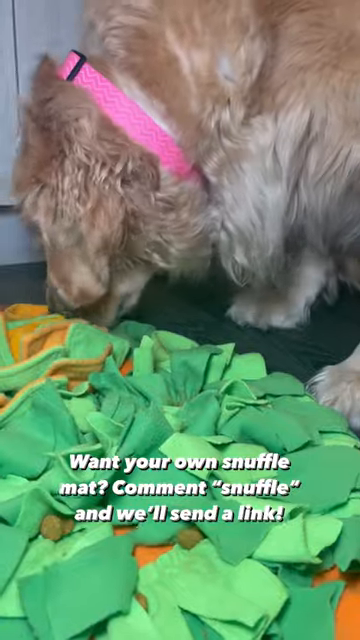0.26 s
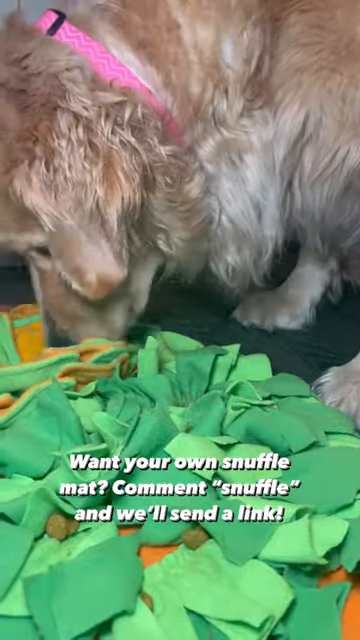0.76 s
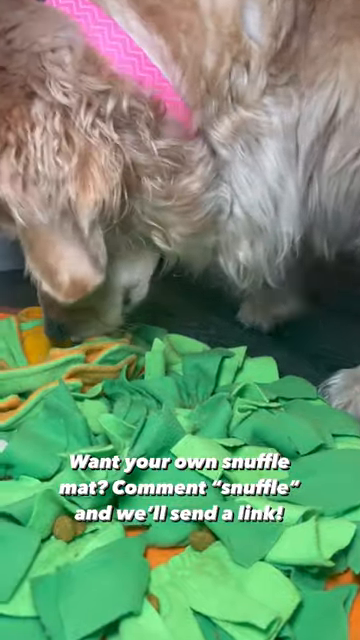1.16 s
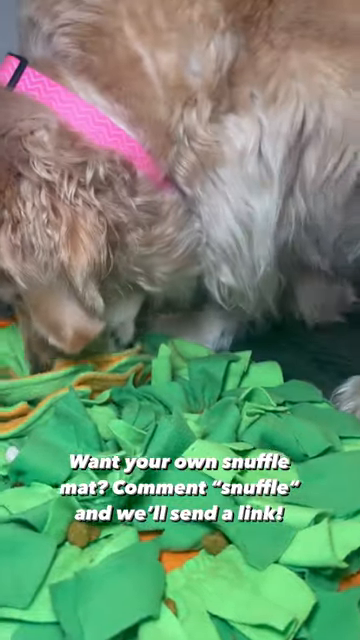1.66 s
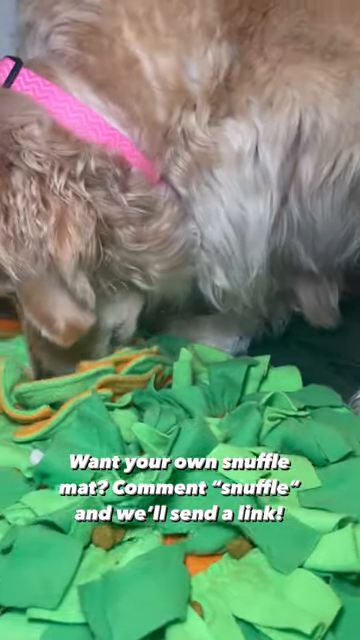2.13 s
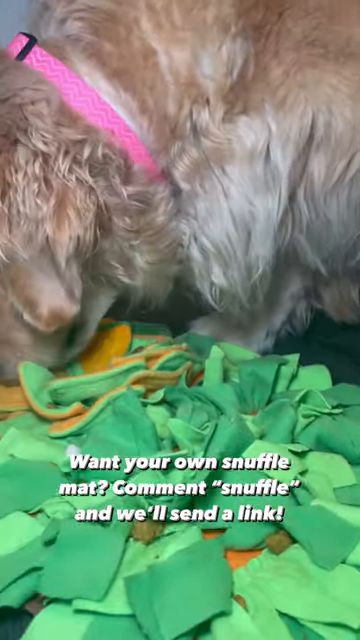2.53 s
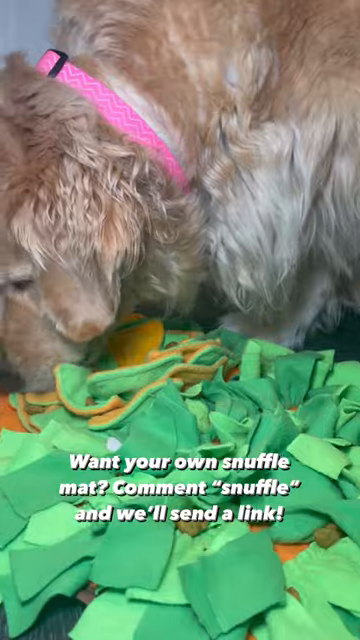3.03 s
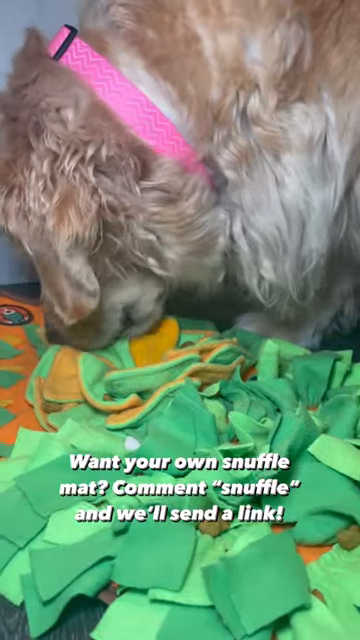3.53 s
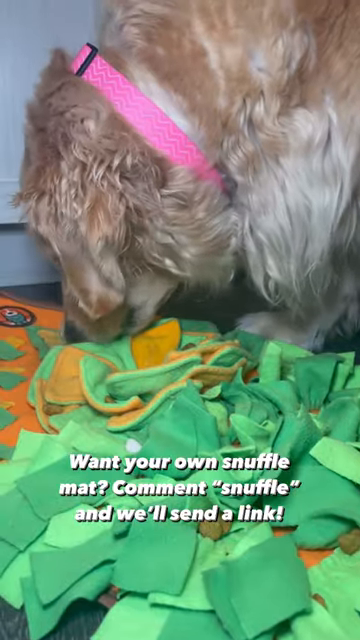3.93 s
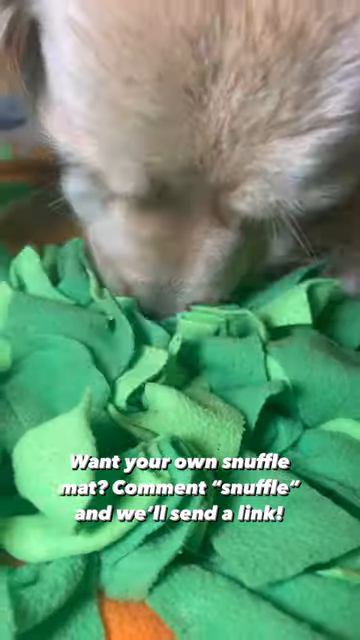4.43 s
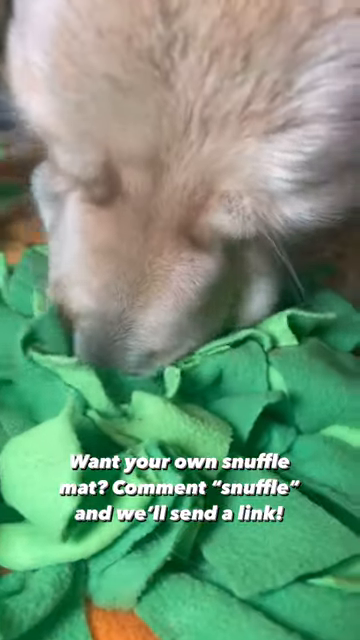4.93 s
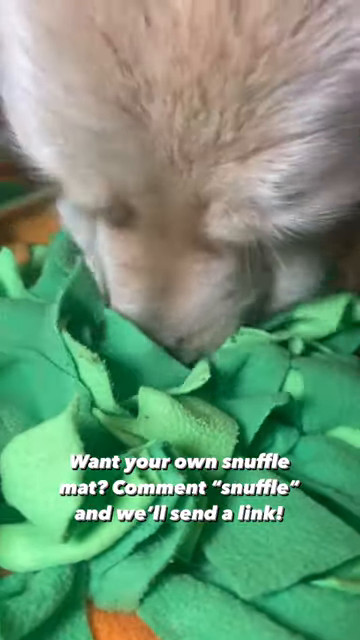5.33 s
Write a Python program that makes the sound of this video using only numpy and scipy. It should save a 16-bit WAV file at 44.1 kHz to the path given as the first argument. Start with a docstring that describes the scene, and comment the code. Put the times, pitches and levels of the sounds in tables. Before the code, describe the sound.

Close stereo sound of a dog eating kibble from a fleece mat in a quiet room with a faint low hum. From 0.2 to 0.6 s, brittle cracks and crumbles come in a dense cluster with hollow jaw knocks. Scattered crunches follow at 0.65-1.2 s, then a very sharp, bright crack at 1.3 s with a soft low paw swell, and a smaller crack near 1.45 s. It calms, leaving soft cloth rustle and, from about 1.95 s, light mouth clops and faint crumbling. A heavy hollow bite thumps at 3.7 s, a lesser one at 3.95 s, small chewing knocks gather after 4.2 s, and the hardest, shortest bite lands at 4.35 s. The room tail cuts off abruptly at 4.39 s. A bright snort with a narrow nasal hiss comes at 4.47 s, then snuffling breath around 4.8 s, fabric rubbing and small dull crumbles until about 5.6 s.

```python
"""On the floor of a quiet room, close to two microphone ports, a dog noses through a fleece mat.
Kibble cracks, crumbles and chips: enveloped noise through resonances, and short rings at one pitch.
Its jaws knock a hollow mouth (decaying modes), hard bites thump the floor, and a paw adds a low swell.
Cloth, breath and a high treble hiss are patchy filtered noise over steady room air and hum; decaying
noise tails are the room's answer. The two ports differ in phase and level by frequency."""
import sys
import numpy as np
from scipy import signal
from scipy.fft import rfft, irfft, next_fast_len
from scipy.io import wavfile
from scipy.ndimage import uniform_filter1d, map_coordinates

SR = 44100
rng = np.random.default_rng(int(sys.argv[2]) if len(sys.argv) > 2 else 0)


def dump_mix(stems):
    """Bounce the given channels to the path in sys.argv[1] as a 16-bit WAV at rate SR."""
    frames = np.atleast_2d(stems).T  # one column per channel
    limited = np.clip(frames, -1, 1)  # hard clip at full scale
    pcm = np.round(limited * 32767).astype(np.int16)
    wavfile.write(sys.argv[1], SR, pcm)


N = 246078

# likeness (correlation) of the two ports for close sources: frequency_hz, likeness
NEAR_LIKENESS = [(60, 0.57), (300, 0.99), (1000, 0.68), (3000, 0.94), (6000, 0.74), (9000, 0.99),
                 (12000, 0.89)]
# likeness of the two ports for room sound and cloth: frequency_hz, likeness
FAR_LIKENESS = [(60, 0.98), (200, 1), (600, 0.029), (1200, 0.042), (2200, 0.69), (3500, 0.13), (5000, 0.93),
                (6000, 0.68), (9000, 1), (12000, 0.91)]
# resonances of kibble and open mouth: centre_hz, width_hz, level_db
CRUMB_MODES = [(674, 810, -7), (1710, 1140, 0.5), (2723, 1870, 0), (3965, 1350, 0.5), (7400, 9400, -7.5),
               (10320, 1210, 1)]

DIRECTIONS = 4  # unrelated noise signals that each break sends out
CUT_S = 4.389  # knocks begun before this time, and the room answer of all earlier sounds, stop here


def amp(db):
    """Logarithmic level: the amplitude gain of a level in dB."""
    return 10 ** (np.asarray(db) / 20)


def unit(x):
    """Root-mean-square normalisation: x scaled to rms 1."""
    return x / np.sqrt(np.mean(x ** 2) + 1e-20)


def along(points, hz):
    """Logarithmic frequency scale: (Hz, value) points read between knots on a log axis."""
    knot_hz, value = np.transpose(points)
    return np.interp(np.log(hz + 1), np.log(knot_hz + 1), value)


def wobble(rate, size):
    """Band-limited fluctuation: a smooth random curve with rate knots a second."""
    knots = rng.standard_normal(int(size * rate / SR) + 4)
    return map_coordinates(knots, [np.arange(size) * rate / SR])


def filtered(x, response):
    """Linear filtering: the spectrum of x times a complex response of frequency."""
    m = next_fast_len(x.shape[-1] + 4096)
    spectrum = rfft(x, m) * response(np.fft.rfftfreq(m, 1 / SR))
    return irfft(spectrum, m)[..., :x.shape[-1]]


def place(out, start_s, sound):
    """Superposition: adds a sound to out from the given time."""
    out[..., round(start_s * SR):][..., :sound.shape[-1]] += sound


def ports(pair, likeness):
    """Spatial coherence: mixes two unrelated signals into left and right of the given likeness."""
    turn = lambda hz: np.arccos(np.clip(along(likeness, hz), -1, 1)) / 2
    mid, side = filtered(pair, lambda hz: np.array([np.cos(turn(hz)), np.sin(turn(hz))]))
    return np.array([mid + side, mid - side])


def rush(spectrum, likeness, patchy_db):
    """Turbulent noise: stereo, rms 1, with patches of random gain in time and frequency."""
    z = signal.stft(rng.standard_normal((2, N)), nperseg=512)[2]
    field = rng.standard_normal(z.shape[1:])
    field = uniform_filter1d(uniform_filter1d(field, 8, 0), 8, 1)
    pair = signal.istft(z * amp(patchy_db * unit(field)), nperseg=512)[1][:, :N]
    coloured = filtered(pair, lambda hz: amp(along(spectrum, hz)))
    return unit(ports(coloured, likeness))


def air():
    """Stationary background: shaped noise plus low room tones, fed by a far fan, that waver."""
    # spectrum of the room's steady air: frequency_hz, relative_level_db
    air_spectrum = [(15, -17.5), (30, -6.5), (60, -2), (150, -8), (220, -8), (370, -24), (800, -27.5),
                    (1700, -39), (2400, -39.5), (3200, -73.5), (8500, -67.5), (10300, -43.5),
                    (11500, -66.5), (12700, -48)]
    # low room tones: frequency_hz, rms_db, waver_db
    room_tones = [(60.3, -62.5, 0.5), (88.5, -65.5, 1), (148.5, -66, 0.5), (231, -72, 2.5)]
    t = np.arange(N) / SR
    hum = np.zeros(N)
    for hz, db, waver_db in room_tones:
        level = np.sqrt(2) * amp(db + waver_db * wobble(11.0, size=N))
        hum += level * np.sin(2 * np.pi * hz * t + 1.01 * wobble(5, size=N))
    return amp(-57.0) * rush(air_spectrum, FAR_LIKENESS, patchy_db=1.77) + hum


def folds(count):
    """Impulsive friction: fleece strips flop together in scattered soft ticks of random pitch and size."""
    when, pitch, size = rng.random((count, 3)).T
    hz, t = 450 * amp(13 * pitch)[:, None], np.arange(600) / SR
    shape = hz * t * np.exp(-hz * t / 1.1)  # a few cycles long at any pitch
    ticks = amp(-3 * np.log(size + .01))[:, None] * np.sin(2 * np.pi * hz * t) * shape
    where = (when * N).astype(int)[:, None] + np.arange(600)
    return unit(np.bincount(where.ravel(), ticks.ravel(), N + 600)[:N])


def snuffle():
    """Friction and turbulence: cloth rustles on the muzzle, breath and the highest treble hiss unsteadily."""
    # muzzle in the cloth, base levels: time_s, rustle_db, breath_db, treble_db
    muzzle_levels = [(0.0, -68, -100, -77), (.25, -62.5, -75, -94), (.37, -73, -70, -62),
                     (.45, -61, -68, -74), (.59, -69.5, -86, -95), (.76, -69.5, -70, -107),
                     (1.12, -57, -102, -64.5), (1.329, -63.5, -65, -71), (1.5, -68.5, -68, -77),
                     (1.62, -69, -87, -94.5), (2.62, -67, -90.5, -93), (3.11, -66, -89, -91),
                     (3.91, -65.5, -84, -89), (4.3, -68, -84, -113), (4.55, -63, -71, -83),
                     (4.8, -60.5, -63, -67), (4.96, -63.5, -82, -73), (5.35, -66.5, -93, -84.5),
                     (5.58, -65, -87, -73)]
    # spectrum of cloth rustle: frequency_hz, relative_level_db
    cloth_spectrum = [(150, -4.5), (400, 4.5), (900, -6), (1600, -12.5), (3000, -22.5), (6000, -26.5)]
    # spectrum of breath hiss: frequency_hz, relative_level_db
    breath_spectrum = [(700, -68.5), (1500, 11.5), (2500, -2), (4500, -7.5), (7500, -8), (10000, 10),
                       (12500, 6)]
    # spectrum of the highest treble hiss: frequency_hz, relative_level_db
    treble_spectrum = [(5000, -54.5), (7500, -13.5), (9500, 10.5), (10500, 25.5), (11500, 4), (12700, -54)]
    s, *levels = np.transpose(muzzle_levels)
    cloth_db, breath_db, treble_db = [np.interp(np.arange(N) / SR, s, column) for column in levels]
    flutter = wobble(36, size=N)  # shared by both hisses
    rustle = rush(cloth_spectrum, FAR_LIKENESS, patchy_db=2.5) + .28 * folds(count=1500)
    brushing_db = 0.89 * wobble(60, size=N) + 0.7 * wobble(7.1, size=N)
    cloth = amp(cloth_db + brushing_db) * rustle
    breath = amp(breath_db + 3 * flutter) * rush(breath_spectrum, NEAR_LIKENESS, patchy_db=4)
    treble = amp(treble_db + 1.5 * flutter) * rush(treble_spectrum, NEAR_LIKENESS, patchy_db=3)
    return cloth + breath + treble


def crumb(hz, tilt_db, arch_db, shift):
    """Modal summation: resonances of kibble and mouth; tilt brightens, arch gathers sound in the middle."""
    shift_db = .8  # how far the resonances move from break to break, as a frequency ratio
    modes = 0
    for k, ((centre, width, db), a) in enumerate(zip(CRUMB_MODES, shift)):
        c = centre * amp(shift_db * a)
        modes = modes + (-1) ** k * amp(db) * 1j * hz * width / (c * c - hz * hz + 1j * hz * width + 1)
    octave = np.log2(np.clip(hz, 500, 12000) / 4200)
    return modes * amp(tilt_db * octave - arch_db * octave ** 2)


def fracture(shape, spray, tilt_db, arch_db):
    """Source and filter: a spray of tiny fractures excites the resonances; power is set by its envelope."""
    shift = np.append(rng.standard_normal(len(CRUMB_MODES) - 1), 0)  # the top resonance stays
    sound = filtered(shape * spray, lambda hz: crumb(hz, tilt_db, arch_db, shift))
    return sound / np.linalg.norm(sound[0]) * np.linalg.norm(shape)


def bursts():
    """Dense fracture noise: longer crumbling and snorting; soft bursts swish, loud ones crackle."""
    # crumbling and snorting bursts: start_s, level_db, rise_s, hold_s, tilt_db_per_octave
    crumbling = [(0.0, -54.5, 0.0011, 0.0056, -5), (0.226, -62.5, 0.043, 0.091, 1.5),
                 (0.28, -53, 0.02, 0.04, 1.5), (0.452, -58.5, 0.0072, 0.119, -1.5),
                 (0.914, -46, 0.027, 0.008, -4), (1.047, -46, 0.021, 0.0083, 1),
                 (1.132, -53.5, 0.0045, 0.022, -1.5), (1.162, -35.5, 0.0031, 0.0081, 7),
                 (2.231, -62, 0.0097, 0.023, 0), (2.851, -64.5, 0.02, 0.08, -3),
                 (3.104, -67, 0.033, 0.056, -10), (3.211, -62, 0.0055, 0.028, -2),
                 (3.945, -56, 0.0037, 0.019, -0.5), (4.15, -70, 0.018, 0.13, -9),
                 (4.194, -63, 0.011, 0.045, -1), (4.263, -60, 0.0039, 0.052, -4),
                 (4.382, -53, 0.032, 0.025, 5.5), (4.47, -43, 0.0031, 0.044, 8),
                 (4.471, -47.5, 0.019, 0.026, -2.5), (4.516, -55, .005, 0.031, 4),
                 (4.742, -60.5, 0.069, 0.067, -14), (4.914, -62, 0.029, 0.022, 1.5),
                 (5.022, -57, 0.0078, 0.01, -10), (5.071, -57.5, 0.032, 0.026, -3.5),
                 (5.18, -59, 0.0088, 0.021, -26), (5.302, -59.5, 0.0098, 0.062, -1.5),
                 (5.461, -59, 0.027, 0.027, -3)]
    t60_s = 0.046
    smooth_db, grain_per_db = -64, .3
    flat_db, arch_per_db = -54.5, 0.48  # louder bursts gather in the middle, softer ones spread wide
    out, t = np.zeros((DIRECTIONS, N + SR)), np.arange(SR // 3) / SR
    for s, db, rise, hold, tilt_db in crumbling:
        shape = np.clip(t / rise, 0, 1) * amp(-60 * np.clip(t - rise - hold, 0, None) / t60_s)
        grain_db = np.clip(grain_per_db * (db - smooth_db), 2, 5.5)
        grain = wobble(1800, size=len(t)) + .6 * wobble(200, size=len(t))
        spray = amp(grain_db * grain) * rng.standard_normal((DIRECTIONS, len(t)))
        place(out, s, amp(db) * fracture(shape, spray, tilt_db, arch_per_db * (db - flat_db)))
    return out[:, :N]


def jaws():
    """Cavity resonance: teeth meet and ring the mouth; soft flesh adds a broad dull puff around that pitch."""
    # hollow jaw knocks: time_s, level_db, cavity_hz, ring_t60_s
    knocks = [(0.008, -45, 542, 0.029), (0.135, -55.5, 802, 0.065), (0.259, -38.5, 780, 0.014),
              (0.3, -45.5, 870, 0.027), (0.33, -48, 722, 0.034), (0.476, -53, 890, .03),
              (0.548, -55, 616, .03), (0.589, -51, 396, 0.029), (1.946, -56.5, 494, 0.044),
              (2.12, -46, 521, 0.052), (2.242, -49.5, 443, 0.035), (2.257, -54, 492, .038),
              (2.495, -47, 678, 0.047), (2.838, -40.5, 522, 0.041), (2.925, -55.5, 934, 0.037),
              (2.942, -51, 553, 0.057), (3.157, -59, 915, 0.046), (3.224, -42, 547, 0.044),
              (3.492, -46.5, 617, 0.046), (3.604, -37.5, 923, 0.03), (3.623, -52, 880, .038),
              (3.648, -44, 814, 0.025), (3.7005, -26, 582, .065), (3.718, -35, 453, .04),
              (3.722, -39.5, 916, 0.039), (3.729, -42, 580, 0.048), (3.741, -50, 600, 0.026),
              (3.754, -50, 580, 0.045), (3.956, -34, 850, 0.045), (4.067, -54.5, 602, 0.057),
              (4.151, -55.5, 896, 0.056), (4.186, -61, 876, 0.045), (4.206, -57, 944, 0.057),
              (4.232, -51.5, 823, 0.057), (4.274, -47, 580, 0.049), (4.285, -51, 610, 0.055),
              (4.286, -47.5, 880, 0.043), (4.295, -45.5, 610, .038), (4.302, -45, 636, 0.043),
              (4.33, -53, 570, 0.054), (4.3495, -22, 567, 0.018), (4.36, -37.5, 760, 0.051),
              (4.361, -45, 894, 0.05), (4.846, -59, 885, .038), (5.156, -47.5, 650, 0.036)]
    # modes of the mouth cavity: multiple_of_cavity_hz, level_db, share_of_t60
    cavity_modes = [(0.222, -21.5, 4.1), (0.399, -10.5, 1.08), (.7, -14.5, 0.51), (0.996, 3.5, 1.034),
                    (1.028, -25, 6.6), (1.55, 7, 0.12), (2.05, -17.5, 0.34), (2.898, -22, 0.63)]
    # where the jaws are: time_s, left_minus_right_db
    jaw_pan = [(2.1, 2), (3.9, 3.5), (4.29, 4.5), (4.34, 2.5)]
    puff_db, rise_s = -9.5, 0.0013  # puff under the ring; time constant of the onset
    out, t = np.zeros((2, N + SR)), np.arange(SR // 4) / SR
    for s, db, hz, t60 in knocks:
        pan_db = np.interp(s, *np.transpose(jaw_pan))
        ring = np.zeros(len(t))
        for multiple, level, share in cavity_modes:
            chance_db = rng.standard_normal()
            decay = amp(level + chance_db - 60 * t / (t60 * share))
            ring += decay * np.sin(2 * np.pi * hz * multiple * t)
        fade = amp(-60 * t / (1.97 * t60))
        dull = lambda f: np.exp(-np.log((f + 1) / (0.81 * hz)) ** 2 / 0.5)
        puff = filtered(fade * rng.standard_normal(len(t)), dull)
        bite = ring + amp(puff_db) * puff * np.linalg.norm(fade) / np.linalg.norm(puff)
        bite *= 1 - np.exp(-t / rise_s)
        if s < CUT_S:
            bite *= np.clip((CUT_S - s - t) / .003, 0, 1)
        place(out, s - .001, amp(db + np.array([[pan_db], [-pan_db]]) / 2) * bite)
    return out[:, :N]


def cracks():
    """Brittle fracture: each break is spiky decaying noise, different in each direction."""
    # kibble cracks and faint, very bright ticks: start_s, nominal_peak_db, tilt_db_per_octave
    breaks = [(0.147, -54, -2.5), (0.2012, -34, 12), (0.206, -35.5, -3.5), (0.2331, -35.5, -3),
              (0.2586, -27, 1.5), (0.2854, -26.5, 3.5), (0.2902, -33.5, -5.5), (0.299, -22.5, 10),
              (0.313, -30.5, -3), (0.3216, -26, 2), (0.3286, -26, 0), (0.33, -23.5, 0.5), (0.339, -28.5, 9),
              (0.458, -25, 5.5), (0.5109, -19.5, 8), (0.579, -42.5, -13), (0.6638, -33.5, 5),
              (0.744, -44, -6.5), (0.7717, -38, -1.5), (0.7824, -29.5, 14), (0.7908, -42.5, 0.5),
              (0.8745, -36.5, 37), (0.925, -54, 4.5), (0.9267, -40, -1.5), (0.939, -29, -5),
              (0.9478, -38, -5), (1.0324, -29.5, 8.5), (1.1653, -25.5, 2), (1.1727, -21.5, 1),
              (1.3117, -14.5, 3), (1.4578, -29.5, 8.5), (2.591, -48.5, 6.5), (2.6074, -46, 8),
              (2.76, -61, 3), (2.8339, -38.5, -5), (2.9265, -50, 4), (3.032, -52, -1.5), (3.104, -53, -9.5),
              (3.248, -54, -3), (3.289, -45, -11.5), (3.331, -53, -7), (3.4624, -43.5, 3),
              (3.6008, -47, -0.5), (3.699, -26, 1.3), (3.7167, -35, -4.5), (3.923, -59, -2),
              (3.981, -37, -9), (4.0644, -41.5, -11), (4.0796, -39, 9), (4.27, -54.5, -3),
              (4.347, -35.5, -2), (5.222, -50.5, 23), (5.277, -52.5, 2), (5.3487, -42.5, 39)]
    spray_t60_s, snap_t60_s, rise_s = 0.025, 0.0023, 0.00057
    snap_size = 2.3  # first fracture over the spray
    arch_db, grain_db = 0.57, 1.8  # dB per octave squared; fractures of uneven size
    crest_db = 9  # peak over rms
    out, t = np.zeros((DIRECTIONS, N + SR)), np.arange(SR // 3) / SR
    for s, db, tilt_db in breaks:
        # the first fracture snaps hardest
        shape = amp(-60 * t / spray_t60_s) + snap_size * amp(-60 * t / snap_t60_s)
        shape = shape * (1 - np.exp(-t / rise_s)) * amp(grain_db * wobble(1500, size=len(t)))
        spray = rng.standard_normal((DIRECTIONS, len(t)))
        place(out, s, amp(db - crest_db) * fracture(shape, spray, tilt_db, arch_db))
    return out[:, :N]


def chips():
    """Damped free vibration: a chip of kibble rings roughly at one pitch and dies fast."""
    # ringing chips: start_s, level_db, pitch_hz
    ringing = [(0.298, -41.5, 1250), (0.331, -41, 1343), (0.46, -48, 1260), (0.513, -50.5, 1180),
               (0.913, -57, 5360), (0.943, -40, 2690), (0.96, -52, 2690), (1.033, -47, 3130),
               (1.034, -51, 1660), (1.064, -46, 5460), (1.138, -52, 2750), (1.173, -29.5, 2770),
               (2.25, -58.5, 1290), (2.834, -44.5, 1740), (3.129, -63, 1600), (3.234, -53, 1670),
               (3.267, -54.5, 1640), (3.7, -33, 1730), (3.721, -47, 1720), (3.955, -49, 1510),
               (4.233, -47, 1115), (4.35, -35.5, 1453), (5.113, -48.5, 1530), (5.386, -53.5, 2320)]
    t60_s, rise_s = .032, 0.00023
    out, t = np.zeros(N + SR), np.arange(SR // 4) / SR
    for s, db, hz in ringing:
        drift = 1.5 * wobble(250, size=len(t))  # an uneven chip does not hold its phase
        tone = np.sin(2 * np.pi * hz * t + drift)
        place(out, s, amp(db - 60 * t / t60_s) * tone * (1 - np.exp(-t / rise_s)))
    return out[:N]


def paw():
    """Low-frequency floor vibration: a paw rolls its weight, and pitch rises as the boards tighten."""
    # the soft swell: start_s, peak_db, start_hz, end_hz, length_s
    swell = (1.3, -45, 82, 112, .14)
    s, db, start_hz, end_hz, length = swell
    u = np.clip((np.arange(N) / SR - s) / length, 0, 1)
    cycles = length * (start_hz * u + (end_hz - start_hz) * u ** 2 / 2)
    return amp(db) * np.sin(np.pi * u) ** 2 * np.sin(2 * np.pi * cycles)


def whistle():
    """Constricted flow: air squeezed through a half-closed nostril makes narrow noise; a crumbling kibble burst
    also rings in a narrow band of noise."""
    # narrow noise bands, a nasal hiss and then the ring of a crumbling burst: start_s, length_s, level_db,
    # centre_hz, width_hz
    hisses = [(2.41, .22, -86, 4300, 400), (4.472, .052, -52.5, 2200, 200)]
    out = np.zeros(N)
    for s, length, db, hz, width in hisses:
        u = np.clip((np.arange(N) / SR - s) / length, 0, 1)
        noise = unit(filtered(rng.standard_normal(N), lambda f: np.exp(-((f - hz) / width) ** 2)))
        out += amp(db) * np.sqrt(np.abs(np.sin(np.pi * u))) * (u < 1) * noise
    return out


def thumps():
    """Bending-wave dispersion: the high part arrives first, so the dull boom drops in pitch."""
    # the hardest bites shake the floor under the mat: start_s, level_db
    floor_hits = [(3.6996, -31), (3.716, -34), (3.954, -37.5), (4.3484, -33)]
    start_hz, end_hz, fall_s = 520, 140, 0.0069
    t60_s, rise_s = 0.038, 0.0014
    out, t = np.zeros(N + SR), np.arange(SR // 8) / SR
    hz = end_hz + (start_hz - end_hz) * np.exp(-t / fall_s)
    tone = np.sin(2 * np.pi * np.cumsum(hz) / SR)
    boom = amp(-60 * t / t60_s) * tone * (1 - np.exp(-t / rise_s))
    for s, db in floor_hits:
        place(out, s, amp(db) * boom)
    return out[:N]


def room(x):
    """Reverberation: noise tails decay at each frequency's own speed, one for each direction of x."""
    # decay of the room: frequency_hz, t60_s
    room_decay = [(300, 0.08), (2000, 0.45), (6000, 0.39), (11000, 0.2)]
    out, step = np.zeros((2, N + 2 * SR)), SR // 3
    for a in range(0, N, step):  # new tails every third of a second
        noise = rng.standard_normal((2, len(x), SR // 2))
        hz, t, z = signal.stft(noise, SR, nperseg=256)
        decay = amp(-60 * t / along(room_decay, hz)[:, None])
        tail = signal.istft(z * decay, SR, nperseg=256)[1]
        tail = tail / np.linalg.norm(tail[0])
        wet = signal.fftconvolve(x[None, :, a:a + step], tail, axes=2).sum(1)
        out[:, a + 200:][:, :wet.shape[1]] += wet  # the answer comes 200 samples late
    return ports(out[:, :N], FAR_LIKENESS)


def scene():
    """Superposition of direct sound, room answer and room air."""
    crunch = cracks() + bursts()
    knock = jaws() + thumps()
    before = np.arange(N) / SR < CUT_S
    send = amp(-11) * crunch + amp(-12.5) * knock.mean(0)
    wet = room(send * before) * before + room(send * ~before)
    direct = ports(crunch[:2], NEAR_LIKENESS) + knock + chips() + paw()
    return direct + wet + snuffle() + whistle() + air()


def record(dry):
    """Interchannel phase and level: ports differ by frequency, and the top of the band falls to a cutoff."""
    # phase between the ports: frequency_hz, left_lead_radians
    port_lead = [(0, 0), (430, .3), (900, 1.2), (1400, .1), (2600, .9), (3900, .7), (4600, 1.8),
                 (5200, 4.9), (5800, 6.1), (8400, 9.1), (10200, 10.1), (11900, 12.5), (12800, 12.6)]
    # level between the ports: frequency_hz, left_minus_right_db
    port_lean = [(60, 0), (350, -3), (640, -1.5), (1150, 1.5), (2500, 0), (4000, -0.25)]
    # common response of the ports: frequency_hz, gain_db
    port_gain = [(10800, 0.5), (11500, -7.5), (12200, -23.5), (12800, -21.5)]
    top_hz = 12800  # nothing passes from here up
    sides = np.array([[1], [-1]]) / 2
    lead = lambda hz: np.exp(1j * sides * np.interp(hz, *np.transpose(port_lead)))
    gain = lambda hz: amp(sides * along(port_lean, hz) + along(port_gain, hz))
    return filtered(dry, lambda hz: lead(hz) * gain(hz) * (hz < top_hz))


dry = scene()
out = record(dry)
dump_mix(out)
```